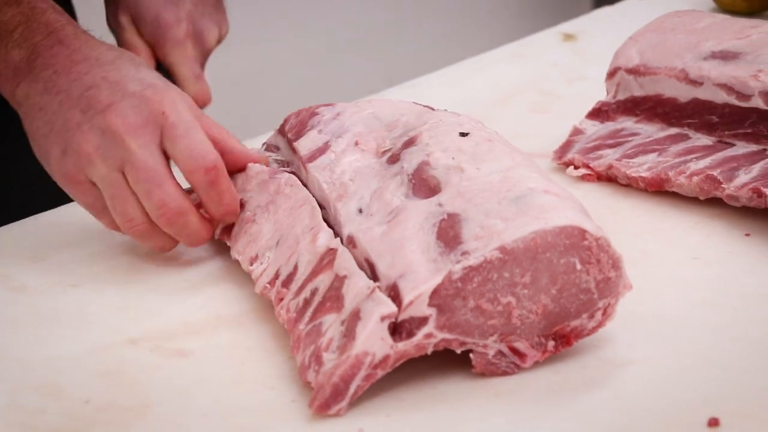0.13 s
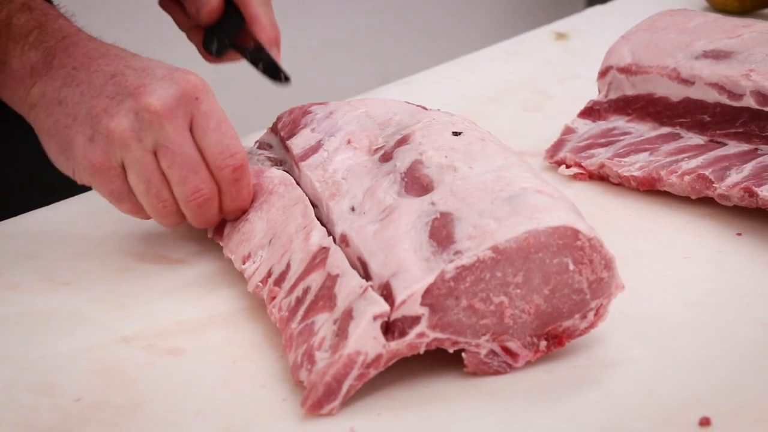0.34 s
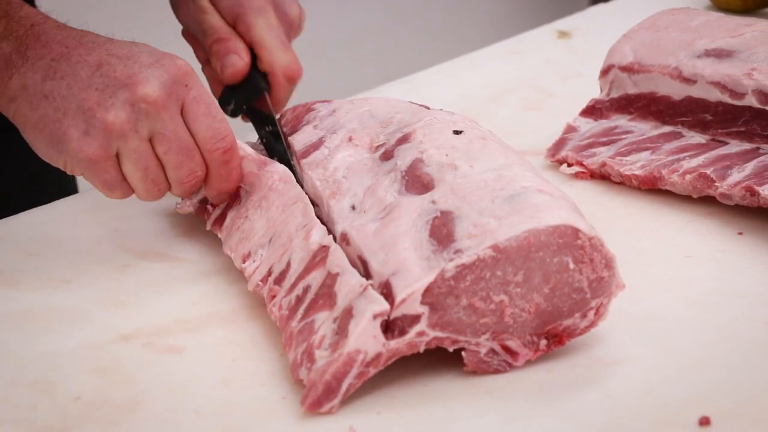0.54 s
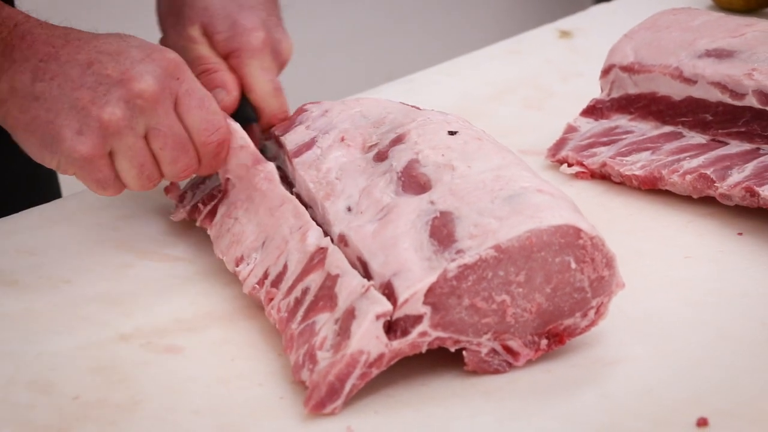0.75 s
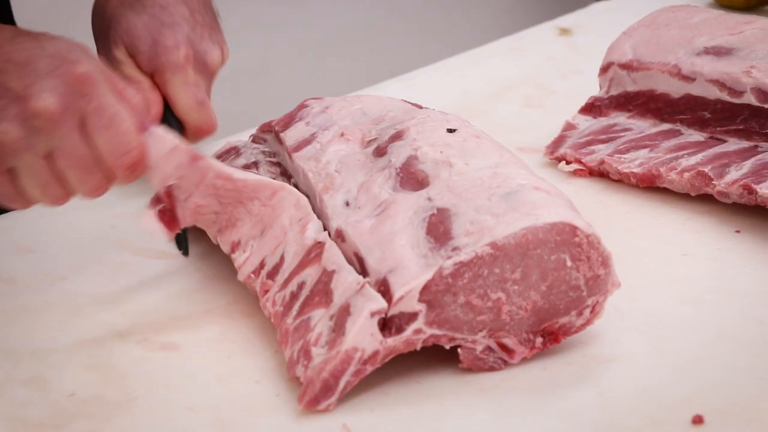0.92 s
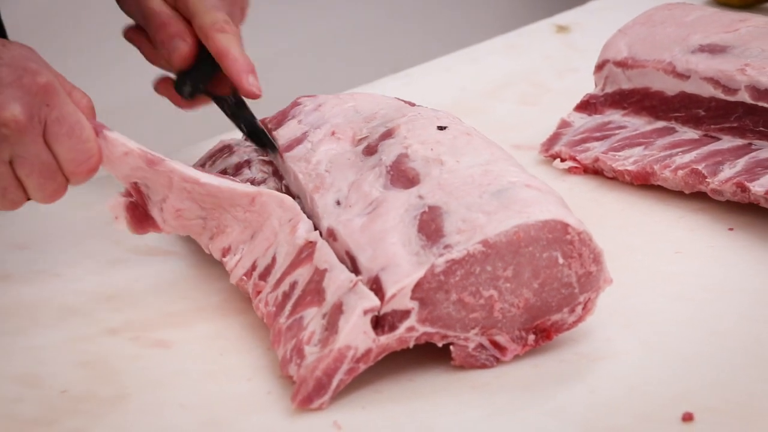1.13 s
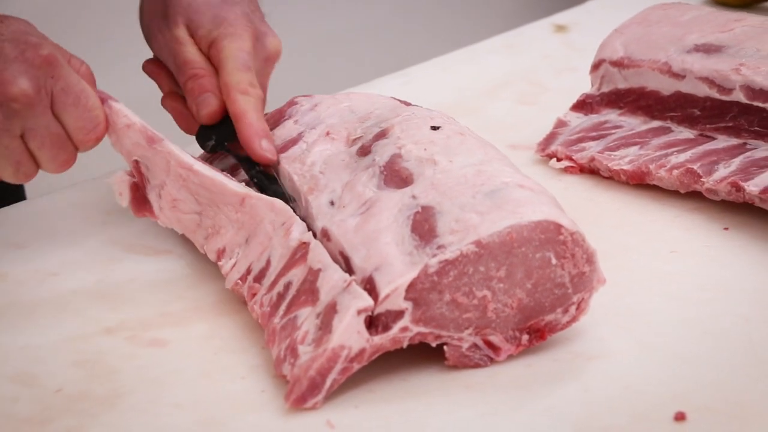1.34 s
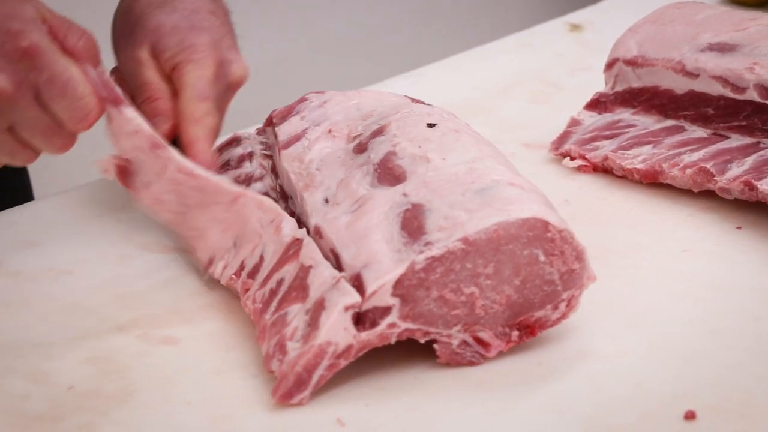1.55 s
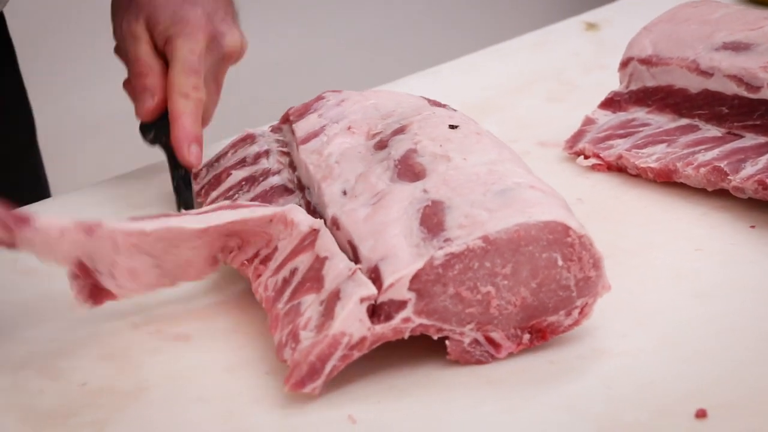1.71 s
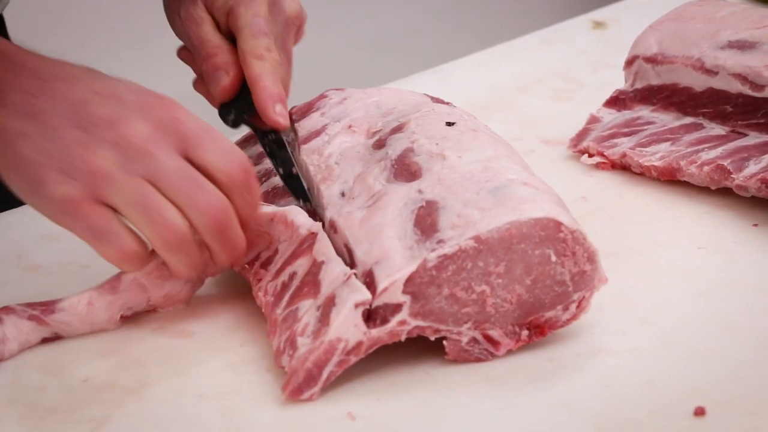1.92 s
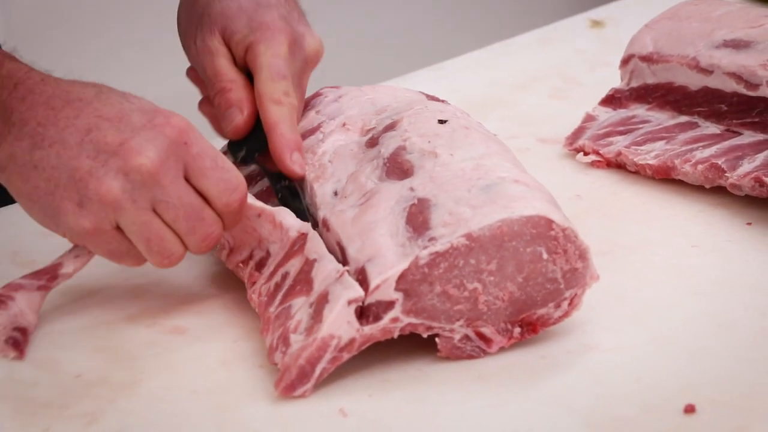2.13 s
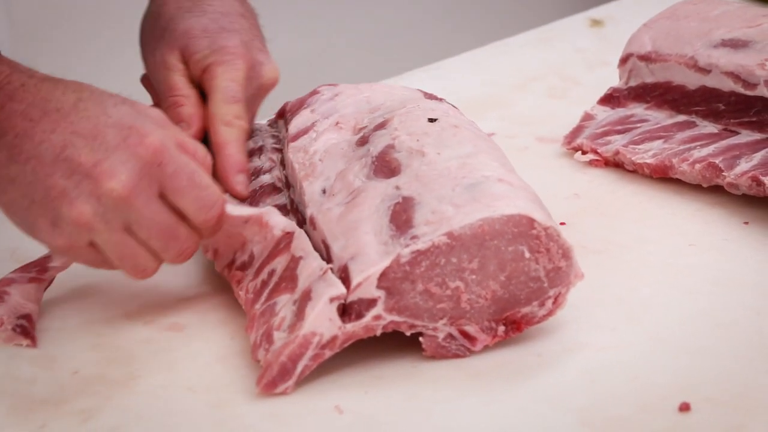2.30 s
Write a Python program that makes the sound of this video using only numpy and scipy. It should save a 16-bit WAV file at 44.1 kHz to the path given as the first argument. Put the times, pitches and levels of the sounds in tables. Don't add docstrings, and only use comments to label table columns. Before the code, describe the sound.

Close view of meat being cut: faint rubbing strokes and wet fibre ticks lead to sharp knife knocks on a hollow board, ringing lightly in a tiled shop with a low fan drone.

```python
import sys
import numpy as np
from scipy import signal
from scipy.fft import rfft, irfft
from scipy.io import wavfile
from scipy.ndimage import uniform_filter1d

SR = 44100
rng = np.random.default_rng(int(sys.argv[2]) if len(sys.argv) > 2 else 0)


def makeup_ratio(level_db):
    decades = np.asarray(level_db, float) / 20
    return 10 ** decades


def pcm_store(signal):
    levels = np.round(np.clip(np.atleast_2d(signal), -1, 1) * 32767)
    wavfile.write(sys.argv[1], SR, levels.astype(np.int16).T)


N = 108574
LEAD = int(0.1 * SR)
M = N + LEAD


def level(x, db):
    return x * makeup_ratio(db) / np.sqrt(np.mean(x ** 2))


def band(x, hz, width_hz):
    return signal.lfilter(*signal.iirpeak(min(hz, 0.45 * SR), max(hz / width_hz, 0.3), fs=SR), x)


def steep_band(x, hz, width_hz):
    return band(band(x, hz, width_hz), hz, width_hz)


def coloured(points, size):
    curve = np.array(points)
    f = np.fft.rfftfreq(size, 1 / SR) + 1
    gain_db = np.interp(np.log(f), np.log(curve[:, 0]), curve[:, 1], left=-90)
    return irfft(rfft(rng.standard_normal(size)) * makeup_ratio(gain_db), size)


def ring(hz, t60):
    t = np.arange(SR // 4) / SR
    return np.sin(2 * np.pi * hz * t) * np.exp(-np.log(1000) * t / t60)


def add(out, s, x):
    i = int(s * SR) + LEAD
    out[i:i + len(x)] += x[:len(out) - i]


def scene_time():
    return (np.arange(M) - LEAD) / SR


def gate(start, attack, end, release):
    t = scene_time()
    rise = np.clip((t - start) / max(attack, 1e-3), 0, 1)
    return rise * np.exp(-np.clip(t - end, 0, 1) / max(release, 1e-3))


def walk(rate):
    k = int(SR / rate)
    return level(uniform_filter1d(uniform_filter1d(rng.standard_normal(M), k), k), 0)


# f/Hz, density/dB
FAN_SPECTRUM = [(15, -67), (25, -53), (124, 9), (192, 2), (232, 1.5), (651, 1.5), (1120, -9.5),
                (8140, -23.5), (16500, -37.5)]
FAN_DB = -53
# f/Hz, width/Hz, level/dB
RUMBLES = [(73, 19, -69.5), (110, 72, -61), (228, 27.6, -64.5)]
MAINS_HZ, MAINS_DB, WOBBLE_HZ = 119, -58.5, 4.36
# t/s, hum level/dB, fan level/dB
COOLER_LOAD = [
    (0, 4, 8.6),
    (.55, 1.5, -0.5),
    (.8, 2, 3),
    (1.3, 3.6, 1.9),
    (1.8, 0, -1),
    (2.1, -1.5, -3),
    (2.46, -6, 3),
]


def cooler():
    load_s, hum_db, fan_db = np.array(COOLER_LOAD).T
    t = scene_time()
    fan = level(coloured(FAN_SPECTRUM, M) * makeup_ratio(0.45 * walk(26)), FAN_DB - 3.5)
    flutter = makeup_ratio(3 * walk(20))
    mains_phase = 2 * np.pi * np.cumsum(MAINS_HZ + WOBBLE_HZ * walk(14.5)) / SR
    mains = level(flutter * np.sin(mains_phase), MAINS_DB)
    hum = mains + sum(level(band(rng.standard_normal(M), f, w), db) for f, w, db in RUMBLES)
    return fan * makeup_ratio(np.interp(t, load_s, fan_db)) + hum * makeup_ratio(np.interp(t, load_s, hum_db))


# f/Hz, width/Hz, t60/s, level/dB
TILE_BANDS = [(125, 150, 0.14, -21.5), (226, 133, 0.82, -24), (396.4, 146, 0.96, -19.5),
              (609, 400, 0.75, -21.5), (1070, 180, 1, -32), (1587, 420, 1.0, -29.5), (2590, 990, 1.0, -28),
              (4000, 2500, 0.89, -22.5), (6600, 1300, 0.71, -25.5), (7500, 940, 0.55, -23),
              (9000, 830, 0.35, -33), (10500, 2000, 0.39, -33.5), (13900, 3400, 0.46, -43)]
TILE_GAP_S = 0.0051


def tiles(x):
    t = np.arange(int(1.5 * SR)) / SR
    tail = np.zeros(len(t))
    for f, w, t60, db in TILE_BANDS:
        diffuse = level(steep_band(rng.standard_normal(len(t)), f, w), db - 25.5)
        tail += diffuse * np.exp(-np.log(1000) * t / t60)
    return signal.fftconvolve(x, tail * np.clip(t / TILE_GAP_S, 0, 1) ** 2)[:M]


# t/s, level/dB, f/Hz, t60/s
SLAB_THUMPS = [(0.208, -52, 125, 0.055), (0.789, -38.5, 179, 0.064), (1.141, -43, 110, 0.094),
               (1.424, -40, 109.2, 0.47), (1.407, -39, 202, 0.12), (1.579, -45, 171, 0.16),
               (1.611, -42.5, 188, 0.18), (1.147, -39, 200, .05), (1.415, -35, 328, 0.04),
               (1.913, -48, 104.6, 0.25), (2.367, -40, 110, 0.23)]
THUMP_RISE_S = 0.0024


def slab():
    out, t = np.zeros(M), np.arange(SR // 4) / SR
    for s, db, hz, t60 in SLAB_THUMPS:
        add(out, s, makeup_ratio(db) * ring(hz, t60) * (1 - np.exp(-t / THUMP_RISE_S)))
    return out


# t/s, level/dB, f/Hz,
# width/Hz, broad click level/dB
FIBRE_TICKS = [(0.203, -41.5, 1545, 120, -30), (0.269, -41, 5850, 400, 11), (0.3975, -30, 7500, 706, 5.5),
               (.3977, -29, 2800, 3000, 7), (.3976, -37, 12300, 1500, -12), (0.4007, -48, 7340, 400, 1),
               (0.6738, -37, 3500, 4030, -7), (.6833, -52, 8000, 3000, 3), (.6915, -32, 1500, 1510, 3),
               (.6915, -48, 11100, 1200, 12), (.741, -51, 5000, 900, -10), (.764, -45, 7550, 900, -15),
               (.7745, -55, 12000, 3000, 1), (0.789, -33.5, 1470, 600, -23), (.802, -33.5, 4040, 2000, -16),
               (0.814, -42, 6500, 1000, -12), (1.6874, -26, 7550, 600, -27), (1.679, -42, 10500, 2000, -5),
               (0.6914, -24, 4940, 604, -2), (.702, -54, 3080, 900, -12), (.7185, -43, 4600, 1000, -12),
               (0.7485, -42, 2600, 1500, -10), (.756, -52, 12000, 5000, 5), (.768, -39, 7500, 2000, 6),
               (0.7885, -35, 4900, 1200, -22), (.812, -44, 12500, 3000, -11), (1.2653, -53, 5270, 1250, 13),
               (2.3643, -35, 7500, 2500, 3), (1.498, -43, 7350, 1500, 7), (1.626, -43, 10500, 1480, -5),
               (1.384, -58, 6200, 507, -25), (1.648, -42, 6000, 3000, -8), (1.644, -35, 12500, 1200, 17),
               (1.6584, -34, 7000, 1010, -20), (2.351, -34, 5100, 1500, -4), (2.3711, -35, 5300, 1500, -12),
               (2.3732, -31, 5000, 1300, -5), (2.392, -44, 6000, 1500, -4)]
CRACK_S, CRACK_HZ = 0.0004, 6000


def fibres():
    out, t = np.zeros(M), np.arange(512) / SR
    noises = rng.standard_normal((len(FIBRE_TICKS), 512))
    for (s, db, hz, width, click_db), noise in zip(FIBRE_TICKS, noises):
        tone = np.sin(2 * np.pi * hz * t) * np.exp(-np.pi * width * t) * np.clip(t * width * 2, 0, 1)
        crack = band(noise * np.exp(-t / CRACK_S), CRACK_HZ, 2 * CRACK_HZ)
        x = tone + makeup_ratio(click_db - 17) * crack
        add(out, s, x * makeup_ratio(db) / np.abs(x).max())
    return out


# f/Hz, density/dB
HISS_SPECTRUM = [(1290, -54), (2200, -0.5), (2890, -7), (4720, -1), (7640, -6.5), (8870, -15),
                 (12200, -15.5), (16000, -24)]
# start t/s, end t/s
STROKE_TIMES = [(.10, .24), (.695, .79), (.79, .948), (1.395, 1.402), (1.464, 1.472), (1.425, 1.515),
                (1.557, 1.62), (1.585, 1.635), (1.41, 1.435), (1.19, 1.24), (1.61, 1.67), (2.16, 2.35),
                (2.36, 2.44)]
# attack/s, level/dB, rub level/dB, edge song level/dB, release/s
STROKE_SHAPES = [(0.1, -54.5, 9, -26, 0.051), (0.0027, -58.5, 2, -8, 0.0037),
                 (0.025, -48.5, -2.5, -4, 0.013), (0.003, -65, -5, 4, 0.0018), (0.0019, -69, -9, 1, .002),
                 (0.014, -70.5, 16, 3, 0.0022), (0.0081, -67.5, 15.5, 7.5, 0.017),
                 (0.011, -71.5, 22, -4, 0.012), (.003, -70.5, 24, -6, 0.0101), (0.024, -68, 10, 2, .015),
                 (0.074, -47.5, 5.5, -2.5, 0.0062), (0.25, -71, 16, 8.5, 0.01),
                 (0.034, -48, -0.5, -27, 0.0066)]
# start t/s, end t/s, from f/Hz, to f/Hz, level/dB
SLIT_WHISTLES = [
    (0.794, 0.95, 1532, 1820, -51),
    (1.474, 1.496, 3420, 3720, -63),
    (2.351, 2.414, 1350, 1560, -56.5),
]
GRIT_PER_S, GRIT_DB = 1000, 2
SING_HZ, SING_WIDTH_HZ = 7080, 2100
SLIT_HZ, SLIT_WIDTH_HZ, SLIT_DB = 4480, 970, -7.5
RUB_HZ, RUB_WIDTH_HZ = 520, 550
GLIDE_S, SAG_HZ_PER_S, WHISTLE_WIDTH_HZ = 0.01075, 650, 480


def friction_grain():
    count = int(GRIT_PER_S * M / SR)
    grit = np.zeros(M)
    grit[rng.integers(0, M, count)] = makeup_ratio(GRIT_DB * rng.exponential(size=count))
    return 0.6 + level(signal.lfilter([1], [1, -0.97], grit), -18)


def whistles():
    out, t = np.zeros(M), scene_time()
    for a, e, f0_hz, f1_hz, db in SLIT_WHISTLES:
        glide = np.exp(-np.clip(t - a, 0, 1) / GLIDE_S)
        hz = f1_hz + (f0_hz - f1_hz) * glide - SAG_HZ_PER_S * (t - a)
        phase = 2 * np.pi * np.cumsum(hz) / SR
        air = walk(WHISTLE_WIDTH_HZ) * np.cos(phase) + walk(WHISTLE_WIDTH_HZ) * np.sin(phase)
        out += makeup_ratio(db) * gate(a, 0.0016, e, 0.015) * air
    return out


def cutting():
    grain = friction_grain()

    def grainy_band(hz, width_hz):
        return level(steep_band(rng.standard_normal(M) * grain, hz, width_hz), 0)

    hiss = level(coloured(HISS_SPECTRUM, M) * grain, 0)
    hiss = hiss + makeup_ratio(SLIT_DB) * grainy_band(SLIT_HZ, SLIT_WIDTH_HZ)
    sing = grainy_band(SING_HZ, SING_WIDTH_HZ)
    rub = level(steep_band(rng.standard_normal(M), RUB_HZ, RUB_WIDTH_HZ) * makeup_ratio(5.2 * walk(65)), 0)
    out = np.zeros(M)
    for (start, end), (attack, db, rub_db, sing_db, release) in zip(STROKE_TIMES, STROKE_SHAPES):
        stroke = hiss + makeup_ratio(rub_db) * rub + makeup_ratio(sing_db) * sing
        out += gate(start, attack, end, release) * makeup_ratio(db) * stroke
    return out + whistles()


# t/s, level/dB, f/Hz, upper mode level/dB, t60/s
BOARD_KNOCKS = [(0.2039, -26.5, 652, 2, 0.022), (.226, -41, 367, -22, 0.025),
                (0.7874, -35.5, 540, -18, 0.0057), (.797, -38, 400, -14, 0.017),
                (0.9127, -16, 670, -5, 0.033), (1.1475, -36.5, 727, -16, 0.0376),
                (0.9497, -12, 620, -12, 0.018), (0.9565, -20, 442, -8, 0.035), (.985, -28, 600, -15, 0.025),
                (1.145, -38, 310, -5, 0.047), (1.4101, -36, 480, -16, .008), (1.4105, -22, 675, -26, 0.021),
                (1.427, -34, 455, 5, 0.0097), (1.447, -45, 770, -17, .02), (1.4712, -39, 640, -24, 0.016),
                (1.485, -44, 543, -17, 0.023), (1.660, -10, 671, -10, 0.017), (1.6726, -18, 568, -21, 0.01),
                (1.679, -23, 550, -5, 0.0079), (1.687, -31, 450, -12, 0.0235), (1.889, -40, 500, -9, 0.015),
                (2.352, -31.5, 396, -8, 0.012), (2.365, -33, 378, -9, 0.011), (2.37, -35, 400, 2, 0.011),
                (2.38, -50, 450, 1, 0.022), (2.417, -35, 620, -3, .03), (2.4322, -11, 668, -18.5, 0.02),
                (2.4429, -14.5, 500, -23, 0.013), (2.449, -24, 620, 2, 0.0074)]
UPPER_RATIO, LOW_RATIO, LOW_DB, LOW_RING = 1.551, 0.617, -14.5, 3.1
THUD_HZ, THUD_DB, THUD_T60_S = 108.2, -21, 0.07
RISE_S = 0.00078
EDGE_HZ, EDGE_WIDTH_HZ, EDGE_DB, EDGE_T60_S = 2200, 1700, -16, 0.03
EDGE_SLOPE = 0.38
CHOKE = 1.55


def board():
    out, t = np.zeros(M), np.arange(SR // 4) / SR
    for s, db, hz, upper_db, t60 in BOARD_KNOCKS:
        modes = np.sin(2 * np.pi * hz * t) + makeup_ratio(upper_db) * np.sin(2 * np.pi * hz * UPPER_RATIO * t)
        x = modes * np.exp(-(4.1 * t / t60) ** CHOKE)
        x += makeup_ratio(LOW_DB) * ring(hz * LOW_RATIO, t60 * LOW_RING)
        x += makeup_ratio(THUD_DB) * ring(THUD_HZ, THUD_T60_S)
        edge = steep_band(rng.standard_normal(len(t)), EDGE_HZ, EDGE_WIDTH_HZ)
        x += makeup_ratio(EDGE_DB + EDGE_SLOPE * (db + 20.5)) * edge * np.exp(-7 * t / EDGE_T60_S)
        x *= 1 - np.exp(-(t / RISE_S) ** 1.74)
        add(out, s, x * makeup_ratio(db) / np.abs(x).max())
    return out


# t/s, level/dB, scrape length/s, table ring level/dB, send to the tiles level/dB
BLADE_SNAPS = [
    (0.9482, -17.5, 0.008, -27.5, -17.5),
    (1.6713, -12.5, 0.0073, -39, -18),
    (2.4425, -12.5, 0.0041, -57, -18),
]
# tip ring f/Hz, tip ring level/dB, heel modes level/dB
BLADE_TIPS = [(7350, -23, -5), (7620, -19, -1), (7760, -20, -4)]
# f/Hz, width/Hz, level/dB
BLADE_MODES = [(2500, 1000, -0.5), (4200, 760, -5), (5400, 1700, -4.5), (6200, 670, -4), (7040, 990, -0.5),
               (7750, 840, -1), (9670, 740, -13.5), (10680, 730, -12.5), (12500, 2800, -16)]
TIP_T60_S, HEEL_HZ = 0.021, 3000
TABLE_HZ, TABLE_T60_S = 379, 0.19
EARLIER_S, EARLIER_DB, EARLIER_HZ, EARLIER_WIDTH_HZ = -0.06, 7.5, 2500, 5000


def blade():
    out, taps, t = np.zeros(M), np.zeros(M), np.arange(2048) / SR
    for (s, db, length, table_db, send_db), (tip_hz, tip_db, heel_db) in zip(BLADE_SNAPS, BLADE_TIPS):
        drive = 1.4 * rng.standard_normal(2048) * np.exp(-(t / length) ** 2)
        drive[0] += 1.6
        x = np.zeros(2048)
        for k, (f, w, g) in enumerate(BLADE_MODES):
            gain = makeup_ratio(g + heel_db * (f < HEEL_HZ)) / np.sqrt(w)
            x += (-1) ** k * gain * band(drive, f, w)
        add(out, s, x * makeup_ratio(db) / np.abs(x).max())
        add(out, s, makeup_ratio(tip_db) * ring(tip_hz, TIP_T60_S))
        add(out, s + 0.0049, makeup_ratio(table_db) * ring(TABLE_HZ, TABLE_T60_S))
        add(taps, s, makeup_ratio(send_db + 24.0) * np.ones(1))
    impulse = (t == 0).astype(float)
    earlier = band(impulse, EARLIER_HZ, EARLIER_WIDTH_HZ) + 0.5 * band(impulse, 590, 880)
    add(taps, EARLIER_S, makeup_ratio(EARLIER_DB) * earlier)
    return out, taps


KNOCK_SEND_DB, CUT_SEND_DB, TICK_SEND_DB = -21.5, -10.5, -14


def scene():
    knocks = board() + slab()
    snaps, taps = blade()
    ticks = fibres()
    cuts = cutting()
    sent = taps + makeup_ratio(KNOCK_SEND_DB) * knocks + makeup_ratio(TICK_SEND_DB) * ticks + makeup_ratio(CUT_SEND_DB) * cuts
    return (knocks + snaps + ticks + cuts + tiles(sent) + cooler())[None, LEAD:]


def top_cut(x):
    return signal.sosfilt(signal.butter(12, 16680, fs=SR, output="sos"), x)


def record(dry):
    x = signal.sosfilt(signal.butter(2, 62, "high", fs=SR, output="sos"), dry)
    x = signal.sosfilt(signal.ellip(6, 0.5, 19, 15750, fs=SR, output="sos"), x)
    x = signal.sosfilt(signal.ellip(12, 0.5, 80, 16620, fs=SR, output="sos"), x)
    return top_cut(x)


dry = scene()
out = record(dry)
pcm_store(out)
```